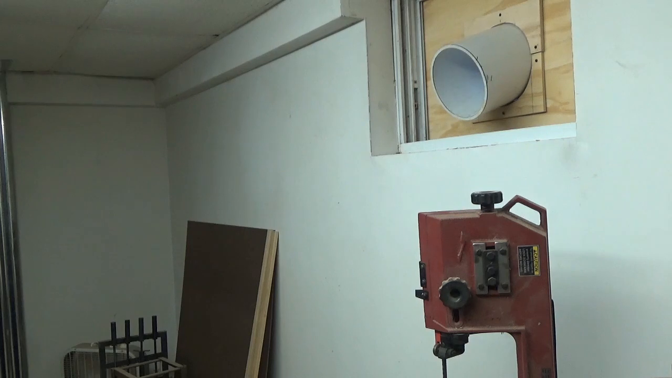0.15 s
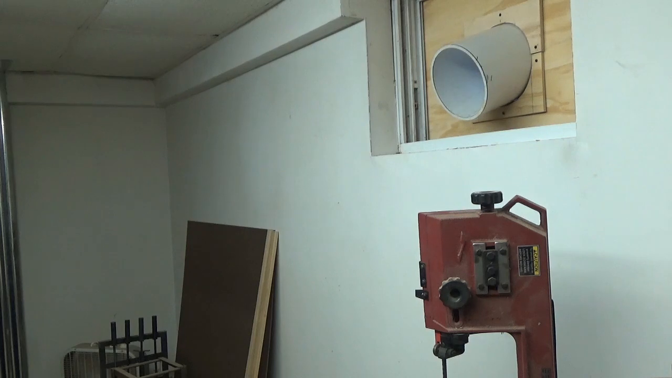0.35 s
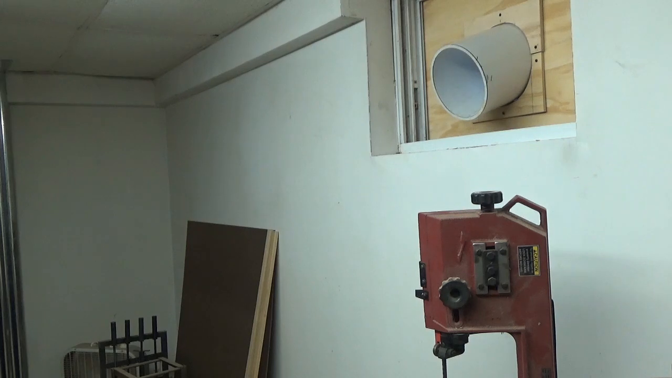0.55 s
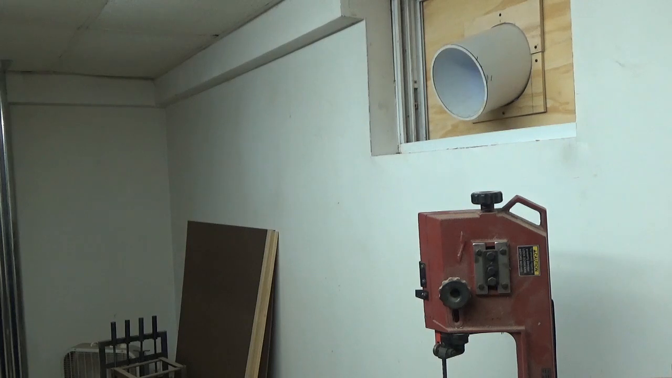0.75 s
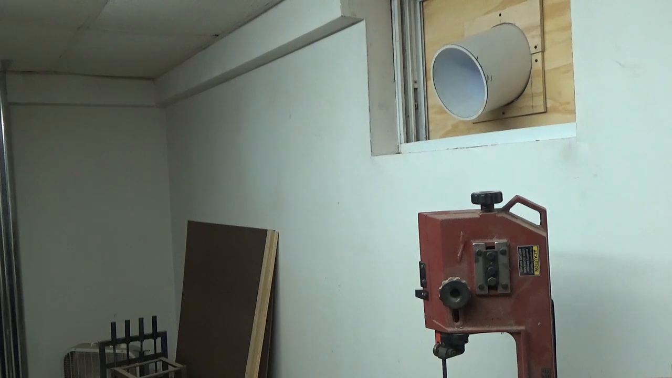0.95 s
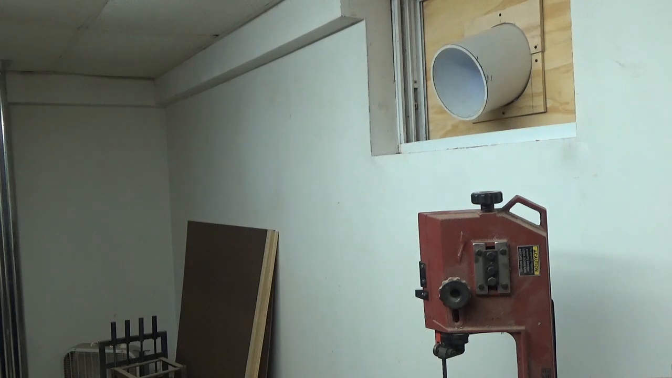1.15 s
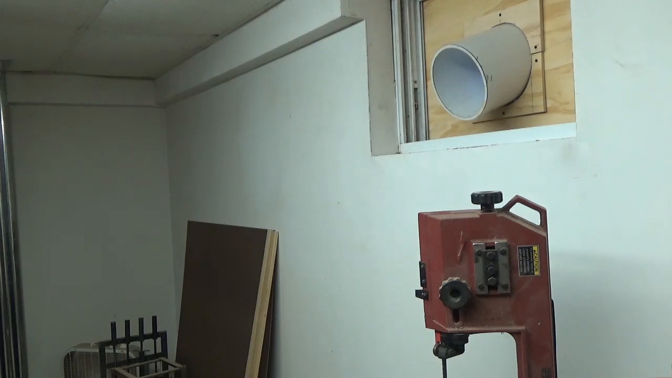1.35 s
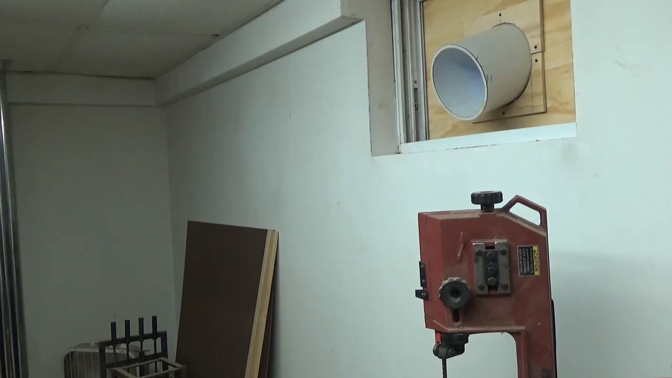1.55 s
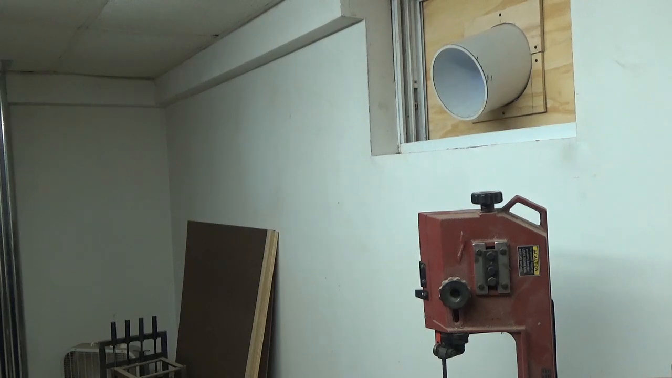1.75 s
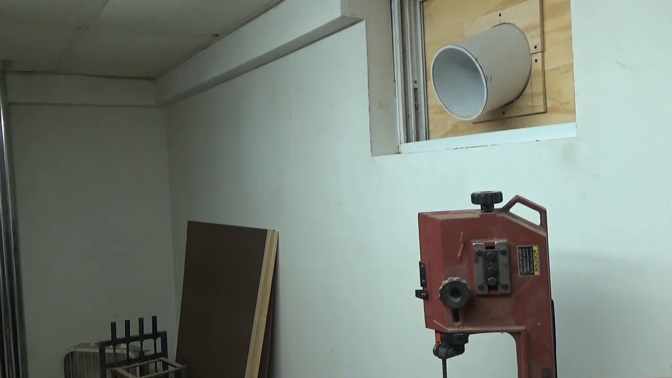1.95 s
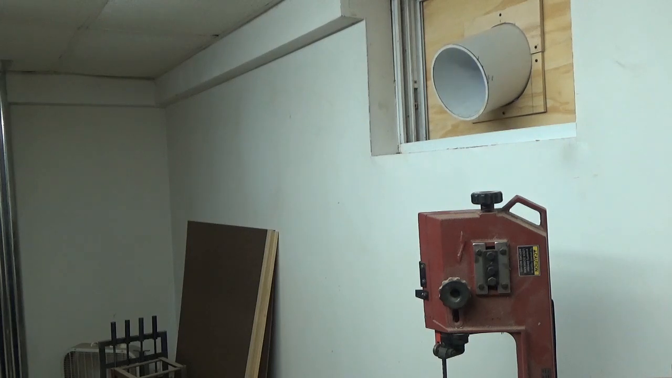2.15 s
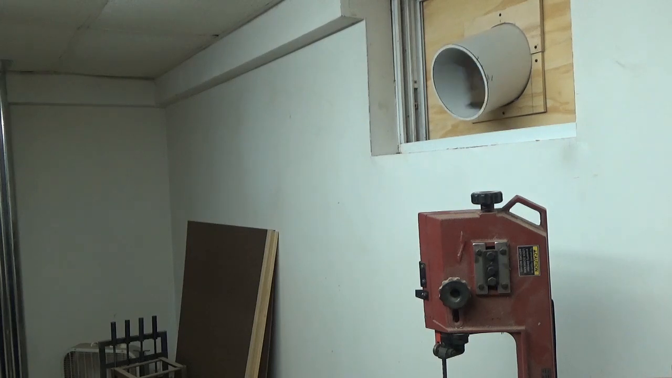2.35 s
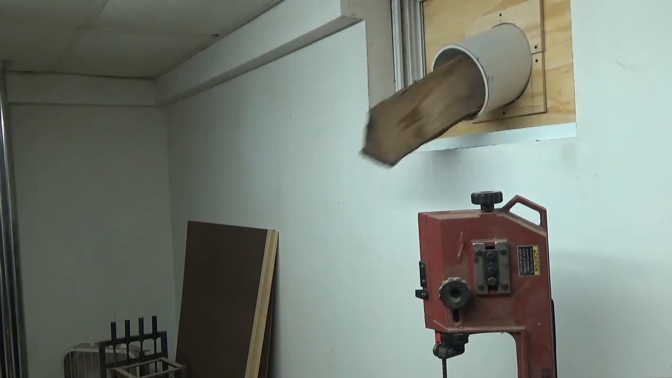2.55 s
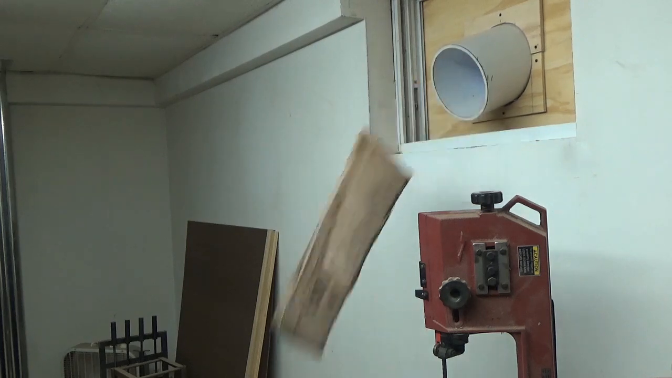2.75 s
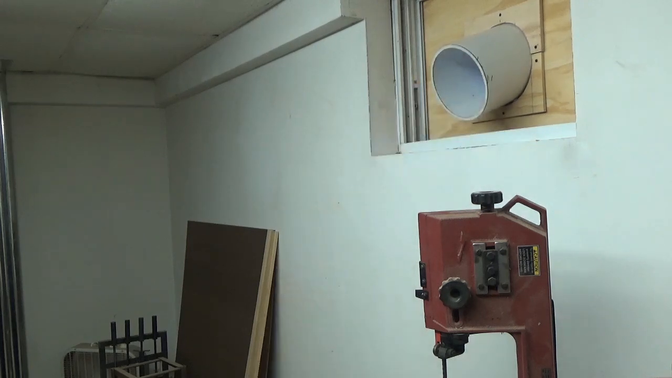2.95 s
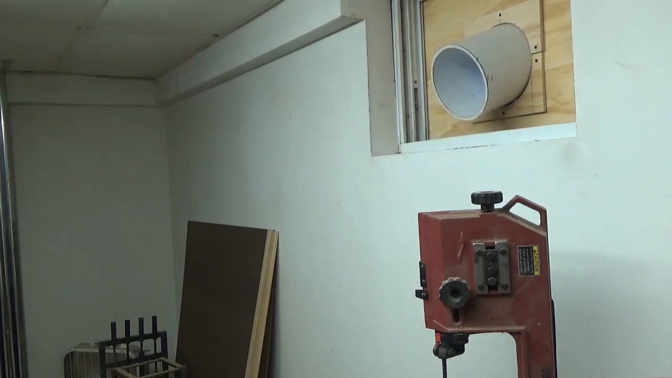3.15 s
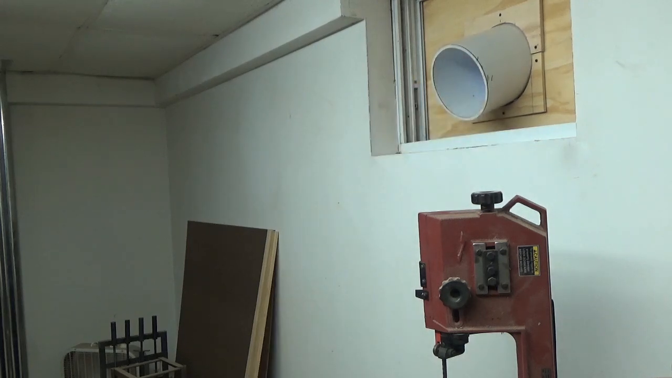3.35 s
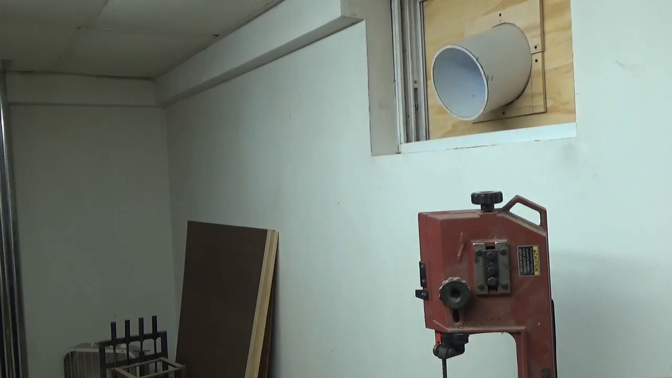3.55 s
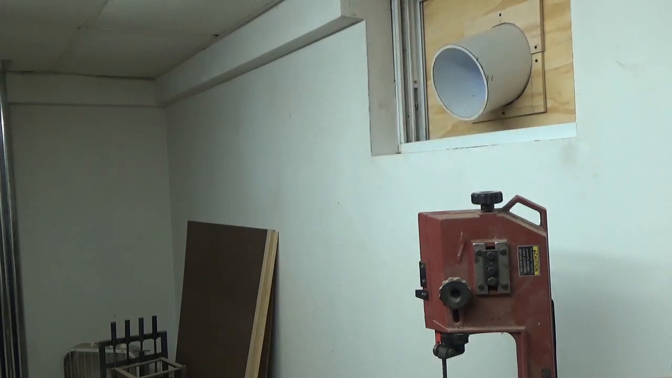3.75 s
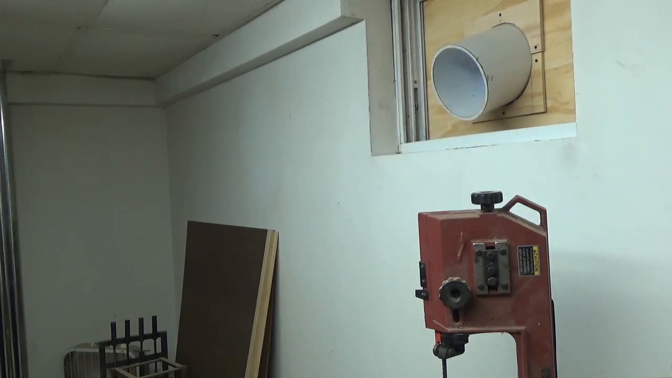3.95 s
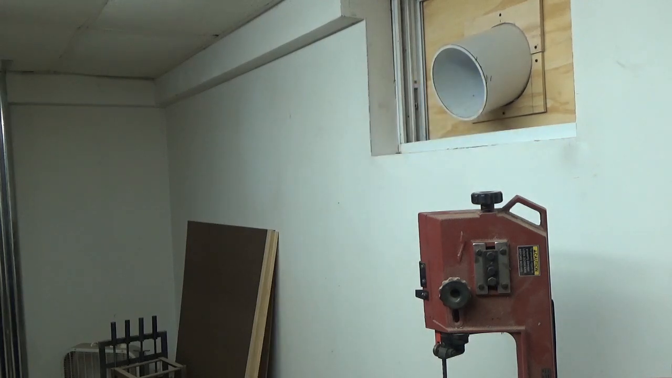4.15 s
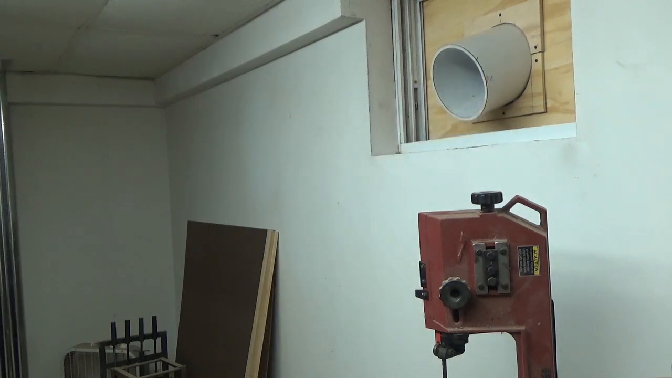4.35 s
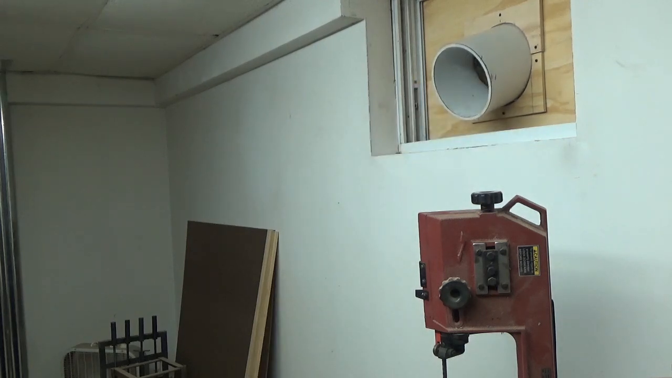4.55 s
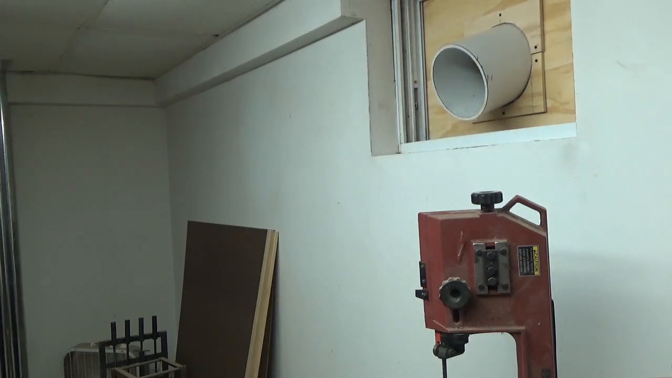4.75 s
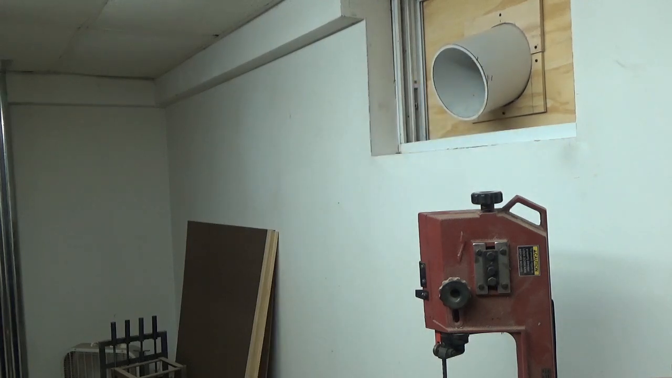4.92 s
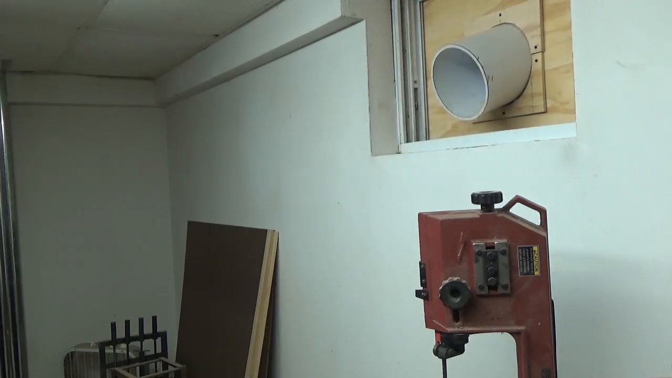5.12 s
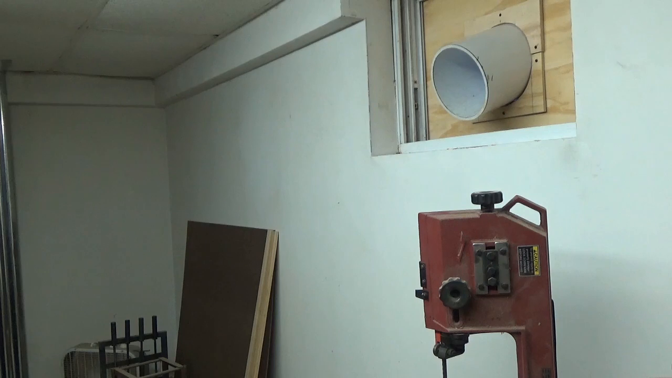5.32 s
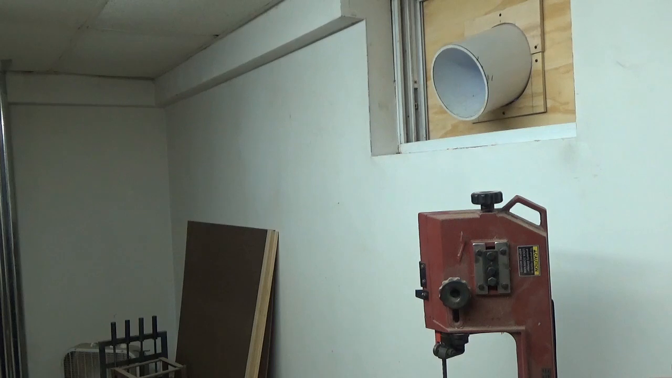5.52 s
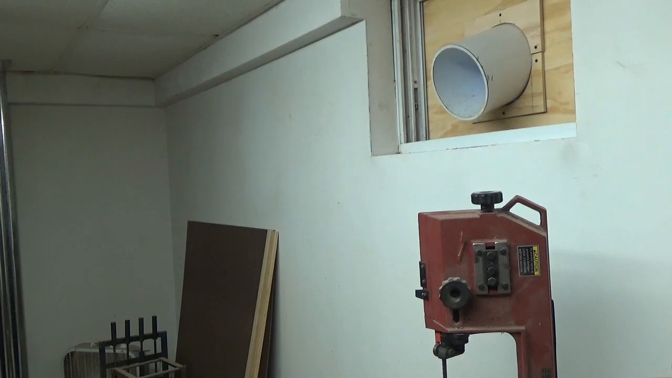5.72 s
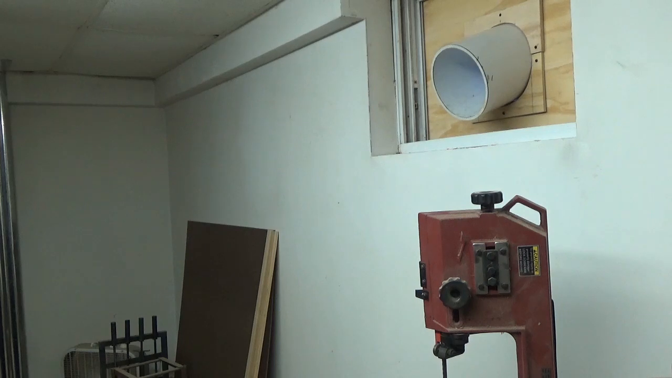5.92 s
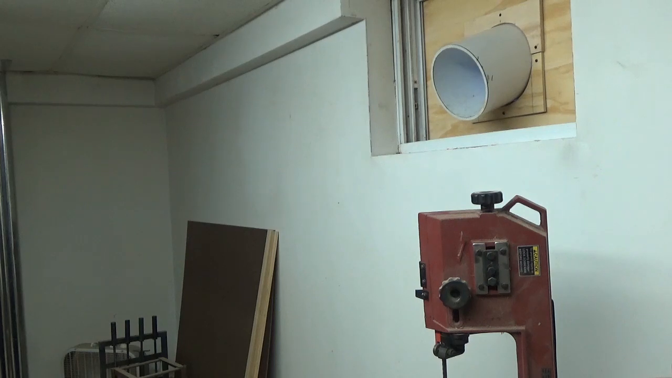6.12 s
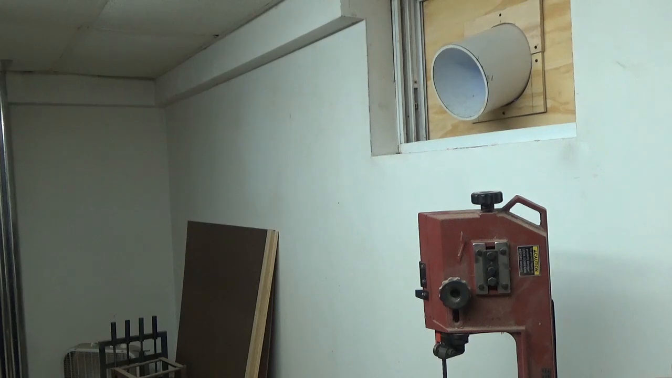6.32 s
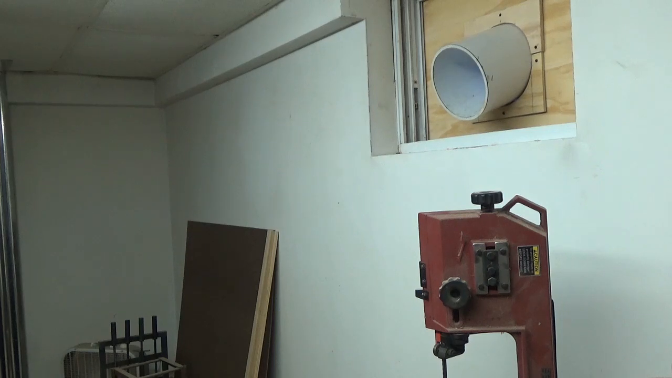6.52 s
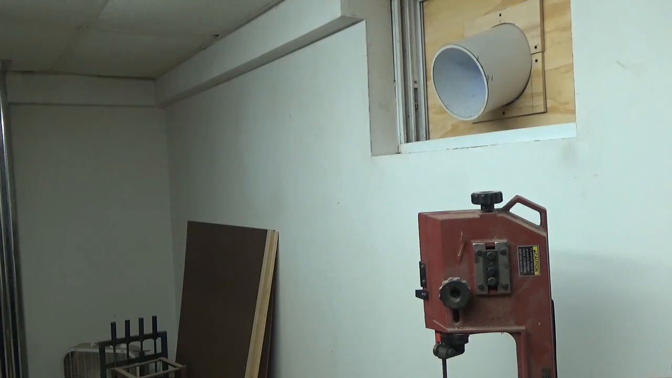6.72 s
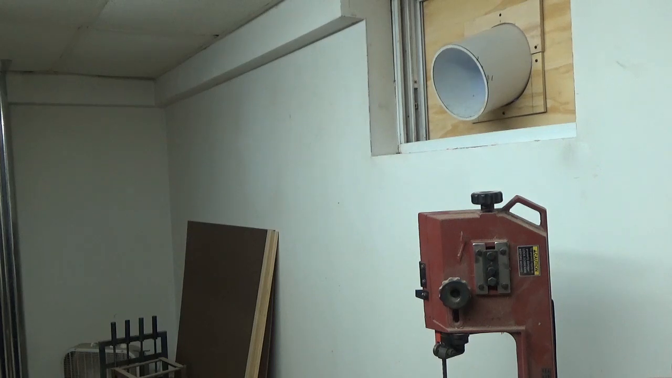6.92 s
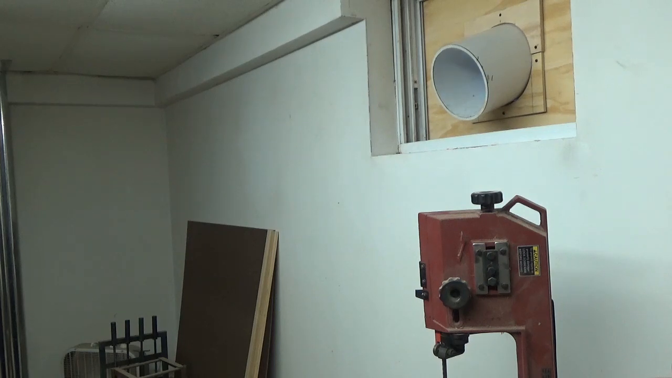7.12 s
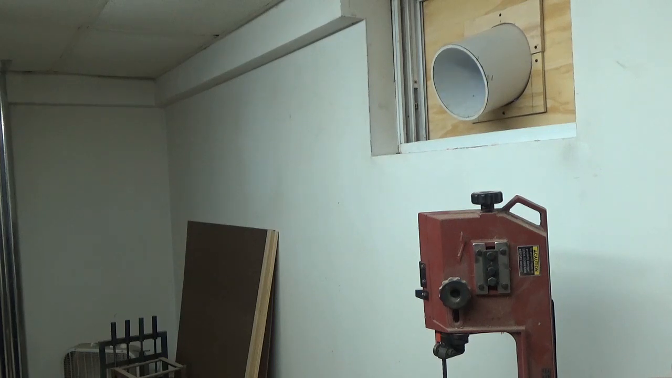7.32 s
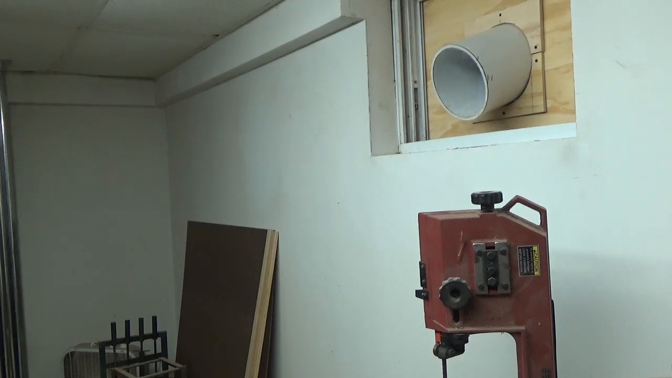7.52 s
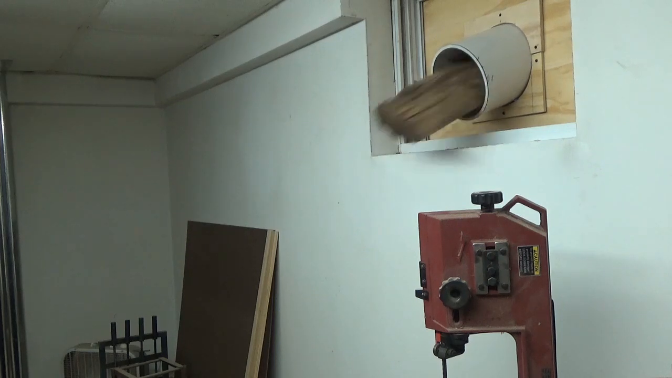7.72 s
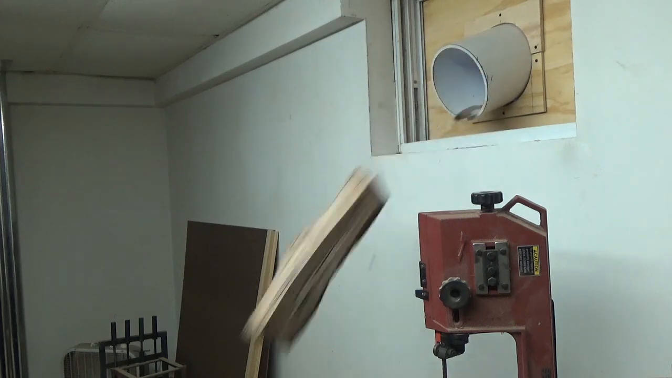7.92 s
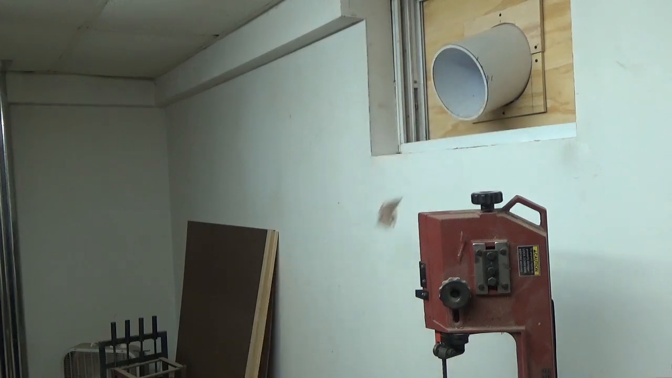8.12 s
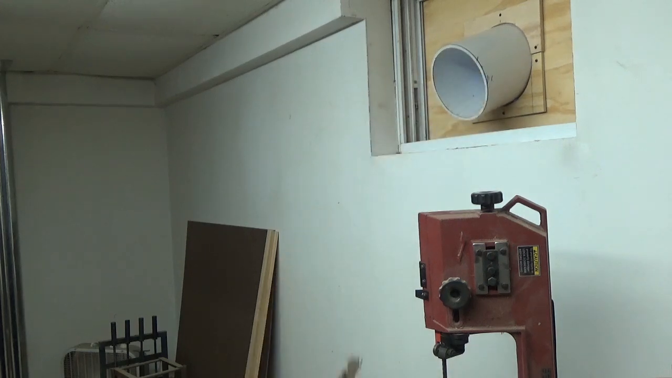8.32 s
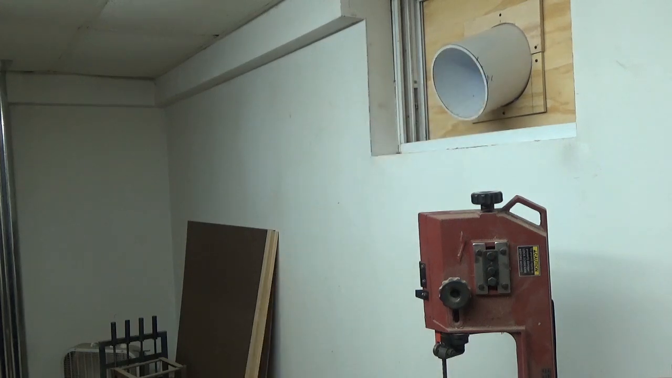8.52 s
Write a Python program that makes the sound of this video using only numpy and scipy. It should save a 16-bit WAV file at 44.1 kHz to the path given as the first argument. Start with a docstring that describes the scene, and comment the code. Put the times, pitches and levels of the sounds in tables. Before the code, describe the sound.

Split logs boom and scrape down a hollow plastic pipe, then crash onto a concrete basement floor with hard wooden knocks and clatter.

```python
"""A plastic pipe booms as split logs are pushed in, bump, slide down and drop onto a concrete basement floor.
Bumps, logs and pipe wall are sums of decaying modes over a dull thud, with a noise crack at the contact.
Drags and bark rustle are trains of random clicks; bark crumbs tick as short narrow cracks.
Bare walls answer with decaying noise, room tone is shaped noise, and a limiter holds the loudest blows."""
import sys
import numpy as np
from scipy import signal
from scipy.fft import rfft, irfft
from scipy.io import wavfile
from scipy.ndimage import uniform_filter1d

SR = 44100
rng = np.random.default_rng(int(sys.argv[2]) if len(sys.argv) > 2 else 0)


def wav_out(sig):
    """Save sig, one row per channel (or a flat mono array), as 16-bit PCM at SR to the path in sys.argv[1]."""
    wavfile.write(sys.argv[1], SR, np.round(np.clip(np.atleast_2d(sig).T, -1, 1) * 32767).astype(np.int16))


N = 382347  # samples

# Event levels below are in dB ahead of the filters, mix gains and limiter.
# Logs bump the pipe. Each row: contact in seconds, boom peak in dB, loudest pitch in Hz,
# crack peak in dB, crack centre in Hz.
BUMPS = [(.243, -27, 504, -29, 5640), (0.344, -32.5, 420, -36.5, 2500), (1.888, -1.5, 192, -6, 1830),
         (1.945, -9, 118, -34, 2800), (2.149, -15.5, 199, -14, 1310), (2.191, -17.5, 268, -14, 3970),
         (2.301, -28, 148, -14, 5100), (2.4, -22.5, 300, -19.5, 1230), (2.452, -9, 112, -7.5, 1470),
         (2.485, -9.5, 180, -3.5, 2100), (2.522, -10.5, 157, -6, 1630), (2.567, -2, 170, -7.5, 1370),
         (2.61, -17.5, 264, -13, 1830), (2.659, -19, 217, -15.5, 3670), (4.142, -21.5, 149, -30.5, 5600),
         (4.331, -28.5, 298, -24, 5330), (4.455, -14, 160, -10.5, 3560), (4.476, -8, 128, -43, 1780),
         (4.71, -38, 120, -35, 5200), (4.908, -25.5, 141, -31, 2530), (5.11, -11.5, 238, -11.5, 2800),
         (5.724, -27, 199, -29, 2300), (5.735, -23, 395, -25.5, 1500), (6.032, -33, 394, -31.5, 1140),
         (7.281, -28, 170, -27.5, 2620), (7.299, -9, 140, -20.5, 2050), (7.574, -17.5, 120, -32, 3000),
         (7.59, -10, 111, -10, 4600), (7.636, -8.5, 210, -23, 1500), (7.652, -24, 370, -8, 3450),
         (7.721, -8.5, 273, -7, 4400), (7.81, -23, 230, -18.5, 3500), (7.84, -20.5, 263, -11, 5000),
         (7.852, -27, 970, -13, 1660)]
# Logs strike the floor or the pile. Each row: start in seconds, knock peak in dB, loudest pitch in Hz,
# ring over the dull thud in dB, crack peak in dB.
KNOCKS = [(3.065, 8, 426, -5, 3.5), (3.508, -7.5, 424, -14, -18), (3.518, -13.5, 2830, 0.5, -8),
          (3.582, -2, 1230, 15.5, -36), (3.618, -2.5, 714, -12.5, -28), (3.66, -8.5, 446, -17, -36),
          (3.838, -9.5, 1110, -6.5, -38), (8.199, -9, 486, -3.5, -9), (8.219, 6.5, 1080, 1, -16),
          (8.25, -6, 293, 0.5, -25), (8.275, -2, 574, -2, -30), (8.448, -2, 340, -6, -10.5),
          (8.515, -12, 607, 5.5, -21), (8.578, -16, 805, -3.5, -26), (8.64, -26, 2400, -12, -20.5),
          (8.661, -1, 720, -3.5, -20)]
# Larger crumbs of bark tick on hard surfaces. Each row: start in seconds, peak in dB, centre in Hz.
TICKS = [(0.132, -38, 8400), (0.147, -39, 6500), (.382, -38, 2980), (0.443, -33, 3420),
         (0.626, -38.5, 3150), (0.7333, -38.5, 4260), (0.9517, -36, 3370), (0.98, -30, 6660),
         (0.991, -26.5, 4300), (1.0906, -34, 3660), (1.698, -46, 6300), (2.429, -23, 3940),
         (2.9285, -32.5, 3830), (3.911, -27, 3970), (4.3585, -37, 3330), (4.396, -42, 4260),
         (5.797, -28, 6600), (5.892, -30.5, 7400), (5.945, -33.5, 7040), (6.257, -36.5, 7290),
         (6.572, -38, 7650), (7.5, -37.5, 4440), (7.9521, -32, 3920), (8.1474, -39, 9690)]
# Wood drags along the pipe. Each row: start, fastest and end in seconds, scrape in dB,
# brightness in dB per octave, rumble in dB.
SLIDES = [(2.02, 2.087, 2.14, -46, -4, -30), (2.3, 2.546, 2.76, -27.5, -9, -41),
          (4.13, 4.159, 4.3, -44, -2.5, -35), (4.219, 4.464, 4.5, -34.5, -3, -33),
          (7.32, 7.737, 7.82, -35, -4.5, -26), (7.8, 7.892, 7.97, -41, 2, -39)]
# Bark rustles while a log is handled. Each row: start, loudest and end in seconds, level in dB,
# brightness in dB per octave.
RUSTLES = [(0.201, 0.377, 1.2, -51, -7), (0.601, 1.064, 1.61, -50.5, -5.5), (4.6, 5.03, 5.15, -54, -2.5),
           (5.677, 5.804, 5.95, -43, 2.5), (5.799, 6.1, 6.73, -47, -0.5), (6.499, 6.91, 7.15, -55, -2)]
# Modes of the pipe. Each row: nominal frequency in Hz, relative level in dB, t60 in seconds.
PIPE_MODES = [(101.8, 2, 0.11), (117.9, -2, 0.25), (143.3, -1.5, 0.19), (182.7, 2.5, 0.12),
              (212.2, -5, 0.17), (246.5, -4, 0.12), (319.3, -1, 0.078), (379, -7.5, 0.15),
              (456.3, -7.5, 0.067), (617.4, -5.5, 0.072), (775, -4.5, 0.049), (1084, -2, 0.056),
              (1843, -2, 0.051), (2350, -4.5, 0.049), (2750, -9.5, 0.037), (3315, -14.5, 0.057),
              (4260, -9.5, .03), (4840, -13, 0.032)]
# Modes of a log. Each row: nominal frequency in Hz, relative level in dB, t60 in seconds.
LOG_MODES = [(166, 5.5, 0.043), (262, 6.5, 0.13), (322, -12, 0.02), (344, 8.5, 0.056), (432, 9, 0.028),
             (530, -28, 0.062), (620, -4.5, 0.03), (730, -7.5, 0.024), (949, 2, 0.059), (1158, 1.5, 0.069),
             (1282, 7.5, 0.03), (1440, 5.5, 0.044), (1662, 11.5, 0.011), (1970, 3.5, 0.087),
             (2430, 11, 0.023), (2933, 22.5, 0.0098), (4020, -3, 0.029), (4800, -19, .03)]
# Echo decay off the bare walls. Each row: frequency in Hz, t60 in seconds.
WALL_T60 = [(80, 0.3), (210, 0.39), (560, 0.34), (1470, 0.29), (3880, 0.3), (9000, 0.23)]
# Echo colour. Each row: frequency in Hz, relative strength in dB.
ECHO_COLOUR = [(100, -7.5), (250, -0.5), (600, 2), (2000, 0.5), (6000, -0.5), (10000, 0)]
# Left-right likeness of the echoes. Each row: frequency in Hz, shared part (0 to 1).
ECHO_SAME = [(60, 0.3), (170, 0.89), (490, 0.54), (1400, 0.54), (4000, 0.62), (11400, 0.65)]
# Room tone colour. Each row: frequency in Hz, relative density in dB per Hz.
AIR_COLOUR = [(12, -47), (20, -24), (64, -49), (82, -5.5), (119, -10.5), (187, 1), (257, -6), (309, -8),
              (705, -15), (1080, -17), (2150, -21), (3970, -31.5), (6410, -31), (9800, -34), (11500, -55),
              (15000, -86), (22000, -120)]
# Left-right likeness of the room tone. Each row: frequency in Hz, shared part (0 to 1).
AIR_SAME = [(60, 0.97), (170, 1), (490, 0.94), (1400, 0.74), (4000, 0.79), (11400, 0.74)]

AIR_RMS_DB = -46  # ahead of the limiter
BOOM_LAG_S = 0.002886  # boom follows the crack
WALL_DB, WALL_DRAG_DB = -10.5, -10.5  # wall ring relative to a bump's crack, to a slide's scrape
WALL_LOW_HZ = 500  # sharp contact rings only pipe modes above this
SHAKE_HZ, SHAKE_T60_S, SHAKE_DB = 28.8, 0.63, -29.0  # level relative to the boom's table level
SPLINTER_HZ = 5400  # crack centre of a falling log
CRUMBS_PER_S, CRUMB_DB, CRUMB_HZ = 14, 12, (3520, 7200)  # total rate; largest peak over the rustle
SLIDE_START_DB, SLIDE_END_DB = -27, -52  # relative to full speed
RUSTLE_START_DB, RUSTLE_END_DB = -18, -22.5  # relative to the loudest moment
LIMIT_DB, RECOVERY_DB_PER_S = -14.5, 2300.0
EDGE_HZ = 11000  # final band limit


def amp(db):
    """Amplitude factor of a level in dB."""
    return 10 ** (np.asarray(db) / 20)


def evened(x):
    """Scales a sound to unit RMS."""
    return x / np.sqrt(np.mean(x ** 2) + 1e-20)


def peaked(x, db):
    """Scales a sound to a peak level."""
    return amp(db) * x / abs(x).max()


def read(points, hz):
    """Reads a table over log frequency."""
    f, value = np.transpose(points)
    return np.interp(np.log(hz + 1), np.log(f + 1), value)


def add(mix, start_s, sound):
    """Adds a sound in place, cut at the end of the mix."""
    part = mix[round(start_s * SR):][:len(sound)]
    part += sound[:len(part)]


def swell(start_s, top_s, end_s, start_db, end_db):
    """A level that climbs steadily in dB to its top and falls again, with soft ends."""
    t = np.arange(start_s, end_s, 1 / SR)
    level_db = np.interp(t, [start_s, top_s, end_s], [start_db, 0, end_db])
    return amp(level_db) * signal.windows.tukey(len(t), 0.1)


def noise_pair(frames, same, size):
    """Two channels of random short-time spectra that share the part same(Hz)."""
    hz = np.fft.rfftfreq(size, 1 / SR)
    a, b, c, d = rng.standard_normal((frames, len(hz), 4)).T
    share = np.clip(read(same, hz), 0, 1)[:, None]
    left, other = a + 1j * b, c + 1j * d
    return hz, np.array([left, share * left + np.sqrt(1 - share ** 2) * other])


def crack(centre_hz, fade_s, below_db=7, above_db=6):
    """Splinters over a few milliseconds; the spectrum falls, in dB per octave, from a centre, with random lumps."""
    t, hz = np.arange(2048) / SR, np.fft.rfftfreq(2048, 1 / SR) + 1
    octaves = np.log2(hz / centre_hz)
    lumps_db = 2.6 * np.interp(np.log2(hz), np.linspace(7, 14, num=15), rng.standard_normal(15))
    shape = amp(np.where(octaves > 0, -above_db, below_db) * octaves + lumps_db)
    fade = (1 - np.exp(-t / (0.37 * fade_s))) ** 2 * np.exp(-t / fade_s)
    burst = rng.standard_normal(2048) * fade
    for _ in range(2):  # keep the random phases, impose the shape, restore the sudden start
        phase = np.angle(rfft(burst))
        burst = irfft(shape * np.exp(1j * phase)) * np.sqrt(fade)
    return burst


def ring(modes, centre_hz, fall_db_per_oct, rise_cycles, ring_db, thud_s):
    """Modes of a struck body, weak far from the loudest pitch, over a dull thud of the same centre."""
    t = np.arange(SR // 5) / SR
    hz, mode_db, t60_s = np.transpose(modes)[:, :, None]
    chance = rng.standard_normal((3, len(modes), 1))  # level, pitch, phase
    start_db = mode_db - fall_db_per_oct * abs(np.log2(hz / centre_hz)) + 2.16 * chance[0]
    waves = np.sin(2 * np.pi * hz * (1 + 0.0066 * chance[1]) * t + 0.65 * chance[2])
    rise = 1 - np.exp(-t * hz / rise_cycles)  # low modes take longer to build
    sound = (amp(start_db - 60 * t / t60_s) * waves * rise).sum(0)
    sound = peaked(sound, ring_db)
    thud = crack(centre_hz, thud_s, below_db=0, above_db=5.5)
    add(sound, 0, peaked(thud, 0))
    return sound


def grit(count, per_s, spread_db):
    """Random clicks of uneven size, arriving in clumps."""
    clumps = amp(4.2 * evened(uniform_filter1d(rng.standard_normal(count), 500)))
    size_db = spread_db * np.minimum(rng.exponential(1, count), 5)
    size = amp(size_db) * rng.choice([-1, 1], count)
    return evened(size * clumps * (rng.random(count) < per_s / SR))


def tilted(x, slope_db_per_oct, low_hz):
    """Tilts the spectrum about 3 kHz and removes the bass."""
    hz = np.fft.rfftfreq(len(x), 1 / SR)
    gain = amp(slope_db_per_oct * np.log2((hz + 200) / 3000)) * (hz > low_hz)
    return irfft(rfft(x) * gain / np.sqrt((gain ** 2).mean()), len(x))


def thinned(x, hz):
    """Removes the deep bass below a given pitch."""
    return signal.sosfilt(signal.butter(2, hz, "highpass", fs=SR, output="sos"), x)


def dulled(x, hz):
    """The long pipe swallows the highest treble."""
    return signal.sosfilt(signal.butter(1, hz, fs=SR, output="sos"), x)


def room_tone():
    """The steady hush of the basement: shaped noise, slightly patchy in time and pitch."""
    frames = N // 256 + 5
    hz, spectra = noise_pair(frames=frames, same=AIR_SAME, size=1024)
    patches = uniform_filter1d(rng.standard_normal((frames, 513)), 12, 1)
    patches = evened(uniform_filter1d(patches, 14, 0)).T
    spectra = spectra * amp(read(AIR_COLOUR, hz)[:, None] + 0.88 * patches)
    hush = signal.istft(spectra, nperseg=1024, noverlap=768)[1][:, :N]
    return amp(AIR_RMS_DB) * evened(hush)


def tick(hz, db, fade_s):
    """One small crack of narrow colour."""
    return peaked(crack(hz, fade_s, below_db=6, above_db=8.5), db)


def ticks():
    """Larger crumbs, one by one."""
    out = np.zeros(N)
    for start_s, db, hz in TICKS:
        add(out, start_s, tick(hz, db, fade_s=0.0049))
    return out


def rustle(start_s, loudest_s, end_s, db, slope_db_per_oct):
    """A thin crackle of bark and dust, with small crumbs falling at random in it."""
    level = swell(start_s, loudest_s, end_s, RUSTLE_START_DB, RUSTLE_END_DB)
    sound = tilted(grit(len(level), 3000, 3.8), slope_db_per_oct, 700)
    for hz in CRUMB_HZ:
        falls = rng.random(len(level)) < CRUMBS_PER_S / len(CRUMB_HZ) / SR
        falls = falls * rng.random(len(level))  # uneven sizes
        crumb = tick(hz, CRUMB_DB, fade_s=0.0085)
        sound = sound + signal.fftconvolve(falls, crumb)[:len(level)]
    return start_s, amp(db) * level * sound


def pipe_ring(centre_hz):
    """One hollow boom of the pipe."""
    return ring(PIPE_MODES, centre_hz, fall_db_per_oct=8, rise_cycles=0.6, ring_db=12.5, thud_s=0.012)


def wall_ring(centre_hz):
    """One short clack: sharp contact rings only the higher modes of the pipe."""
    high = [mode for mode in PIPE_MODES if mode[0] > WALL_LOW_HZ]
    return ring(high, centre_hz, fall_db_per_oct=3.5, rise_cycles=2.2, ring_db=-1, thud_s=0.0038)


def bumps():
    """Each bump cracks at the point of contact, rings the pipe wall and booms in the pipe."""
    out = np.zeros(N)
    for start_s, boom_db, boom_hz, crack_db, crack_hz in BUMPS:
        add(out, start_s + BOOM_LAG_S, peaked(pipe_ring(boom_hz), boom_db))
        contact = crack(crack_hz, fade_s=0.0056, below_db=4, above_db=5)
        add(out, start_s, peaked(contact, crack_db))
        add(out, start_s, peaked(wall_ring(crack_hz), crack_db + WALL_DB))
    return out


def shudder():
    """A faint deep shake, a decaying sine, goes with each bump of the pipe."""
    out, t = np.zeros(N), np.arange(SR // 3) / SR
    rise = 1 - np.exp(-t / 0.0051)
    shake = np.sin(2 * np.pi * SHAKE_HZ * t) * rise * amp(-60 * t / SHAKE_T60_S)
    for start_s, boom_db, *_ in BUMPS:
        add(out, start_s, amp(boom_db + SHAKE_DB) * rng.choice([-1, 1]) * shake)
    return out


def slide(start_s, fastest_s, end_s, scrape_db, slope_db_per_oct, rumble_db):
    """Fibres catch as a ringing scrape, small jolts rattle the log, coarser ones keep the pipe rumbling."""
    drag = swell(start_s, fastest_s, end_s, SLIDE_START_DB, SLIDE_END_DB)
    count = len(drag)
    scrape = tilted(grit(count, 6000, 0.95), slope_db_per_oct, 350)
    wall = signal.fftconvolve(scrape, wall_ring(centre_hz=1840))[:count]
    scrape = scrape + amp(WALL_DRAG_DB) * evened(wall)
    rattle = np.zeros(count)
    for hz in (594, 1110, 1970, 3200):
        jolts = grit(count, 47, 1.4)
        knock = ring(LOG_MODES, hz, 6.3, 0.79, -4.3, thud_s=0.0037)
        rattle += evened(signal.fftconvolve(jolts, knock)[:count])
    rumble = signal.fftconvolve(grit(count, 400, 6.6), pipe_ring(centre_hz=171))[:count]
    friction = amp(scrape_db) * (scrape + amp(-17.5) * rattle)
    return start_s, drag * (friction + amp(rumble_db) * evened(rumble))


def knocks():
    """Each blow rings the log and cracks at the point of contact; a clear ring singles out few modes."""
    out = np.zeros(N)
    for start_s, db, hz, ring_db, crack_db in KNOCKS:
        fall_db_per_oct = max(16.5 + 1.76 * ring_db, 4)
        knock = ring(LOG_MODES, hz, fall_db_per_oct, 0.19, ring_db, thud_s=0.00474)
        add(out, start_s, peaked(knock, db))
        add(out, start_s, peaked(crack(SPLINTER_HZ, fade_s=0.0023), crack_db))
    return out


def basement(x):
    """Dense echoes build within milliseconds; three random sets blend in rotation, so their colour keeps changing."""
    out, turn = np.zeros((2, N)), np.arange(N) / SR * 7.3  # radians
    for k in range(3):
        hz, spectra = noise_pair(frames=80, same=ECHO_SAME, size=1024)
        t = np.arange(80) * 256 / SR
        decay_db = 60 * t / read(WALL_T60, hz)[:, None]
        spectra = spectra * amp(read(ECHO_COLOUR, hz)[:, None] - decay_db)
        tail = signal.istft(spectra, nperseg=1024, noverlap=768)[1]
        tail = tail * (1 - np.exp(-(np.arange(tail.shape[1]) / (0.0016 * SR)) ** 2))
        tail = tail / np.linalg.norm(tail[0])
        share = np.sqrt(2 / 3) * np.cos(turn + k * np.pi / 3)  # squares sum to one
        out += signal.oaconvolve((x * share)[None], tail, axes=1)[:, :N]
    return out


def scene():
    """Direct sound in the middle, echoes and room tone around it."""
    pipe = dulled(bumps(), hz=5200)
    for row in SLIDES:
        add(pipe, *slide(*row))
    pipe = thinned(pipe, hz=86.5)
    logs = thinned(knocks(), hz=164)
    bark = ticks()
    for row in RUSTLES:
        add(bark, *rustle(*row))
    direct = amp(1.5) * pipe + amp(2) * logs + amp(1.5) * bark
    to_walls = amp(1.5) * pipe + amp(7) * logs + amp(1.0) * bark
    return direct + basement(to_walls) + shudder() + room_tone()


def record(dry):
    """A quick limiter holds loud passages level, a soft clip rounds peaks; then the band limit."""
    power_db = 10 * np.log10(abs(uniform_filter1d((dry ** 2).mean(0), 130)) + 1e-12)
    fall_db = np.arange(N) * RECOVERY_DB_PER_S / SR
    held_db = np.maximum.accumulate(power_db + fall_db) - fall_db  # instant rise, steady recovery
    over_db = np.maximum(held_db - LIMIT_DB, 0)
    held = dry / amp(0.91 * uniform_filter1d(over_db, 90))
    held = 1.173 * np.tanh(held / 1.042)
    band = signal.firwin(301, EDGE_HZ, window=("kaiser", 9), fs=SR)
    return signal.oaconvolve(held, band[None], "same")


dry = scene()
out = record(dry)
wav_out(out)
```